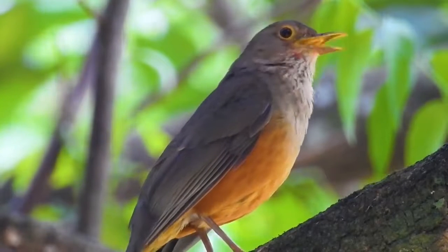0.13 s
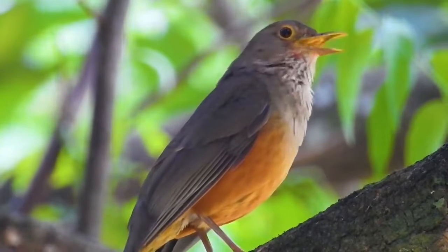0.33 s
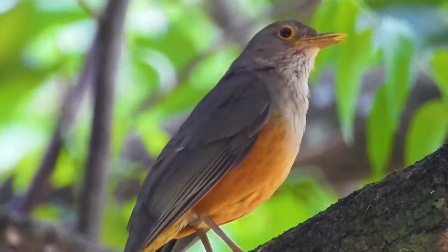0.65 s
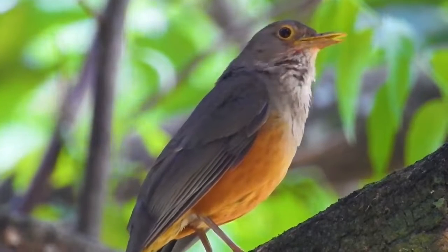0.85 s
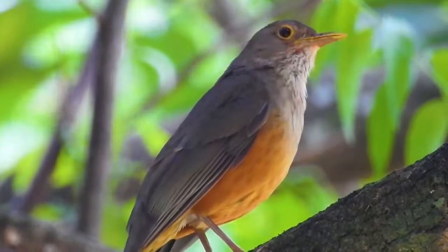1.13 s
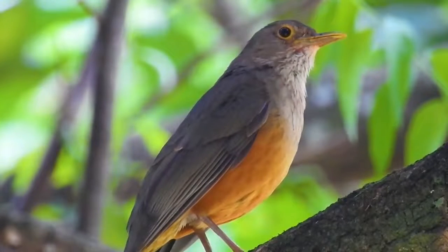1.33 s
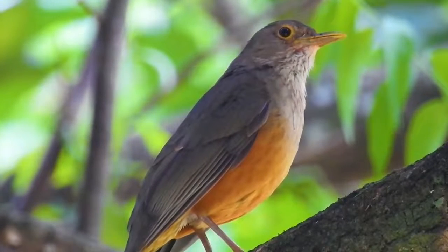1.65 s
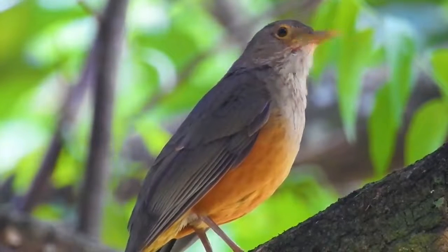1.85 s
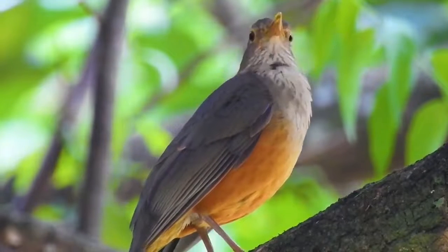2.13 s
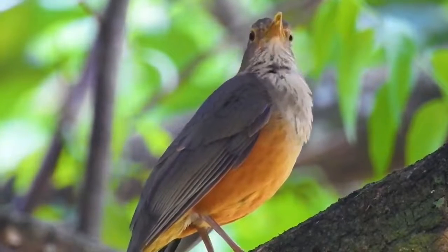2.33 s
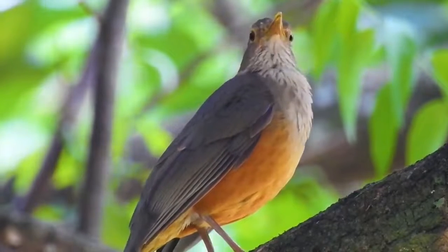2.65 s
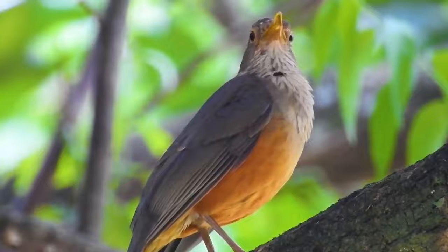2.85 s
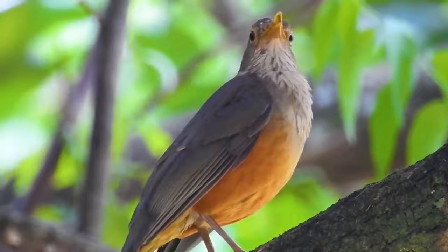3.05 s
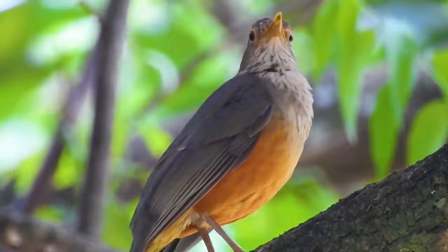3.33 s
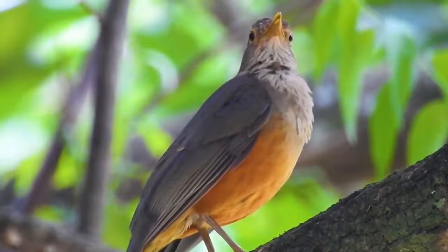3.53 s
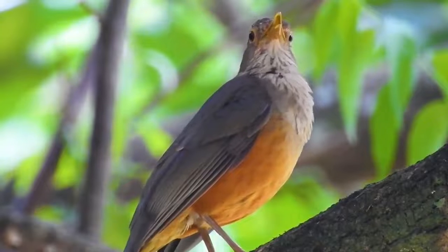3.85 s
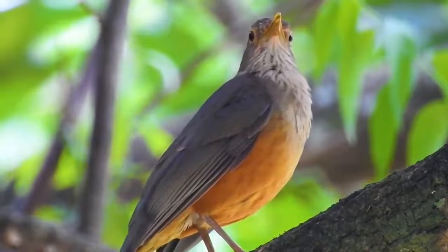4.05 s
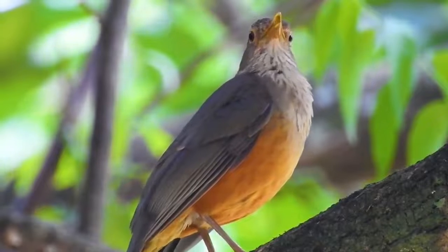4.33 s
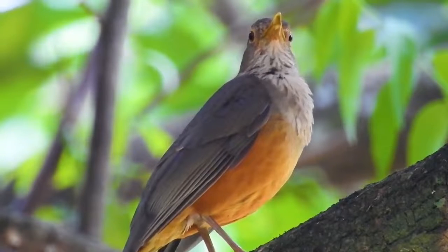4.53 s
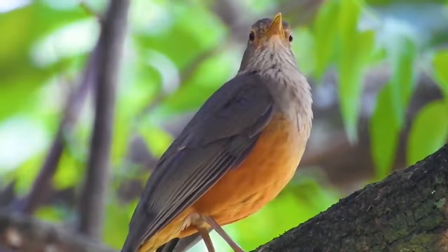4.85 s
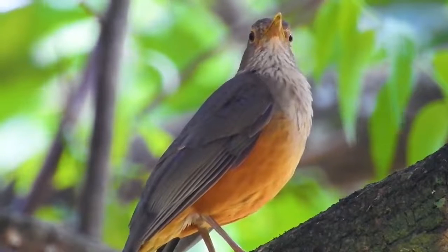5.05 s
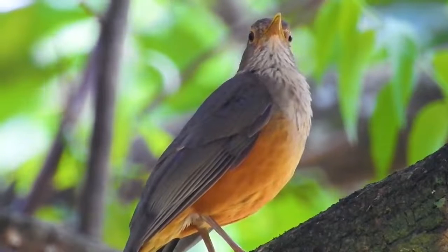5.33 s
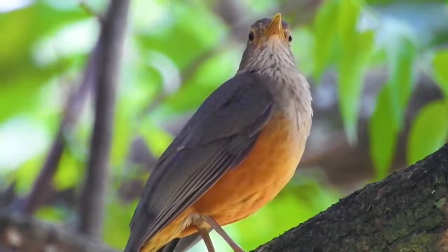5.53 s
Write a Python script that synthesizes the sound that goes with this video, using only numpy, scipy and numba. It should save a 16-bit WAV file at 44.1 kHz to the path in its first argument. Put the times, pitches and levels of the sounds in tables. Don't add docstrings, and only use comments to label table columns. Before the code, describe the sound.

Close, near-pure thrush whistles, mostly around 1.6 to 3.2 kHz, with soft scattered echo from leaves and trunks. A short wobbling note opens at 0 s; at 0.35 s a fast high swoop leads into a rising, held note until about 0.76 s. At 0.95 s a steady note breaks into a very brief rough trill, then drops, ending near 1.2 s. A small sharp click falls around 1.06 s. The bird rests until 2.4 s while a nearer cicada buzzes dryly; another bursts near 2.35 s and winds down in pitch after 2.7 s. Stepped whistles resume at 2.43 s, a swoop and rise at 3 s, a dipping note at 3.6 s, a settling note with pulsing trill at 4.0-4.3 s, and a falling flick into a strong rising note at 4.6-4.95 s. A quick high flourish closes at 5.15-5.5 s. Faint distant whistles, a twitter near 3.85 s and light hiss continue throughout.

```python
import sys
import numpy as np
from scipy import signal
from scipy.fft import rfft, irfft
from scipy.io import wavfile
from scipy.ndimage import uniform_filter1d
from numba import njit

SR = 44100
rng = np.random.default_rng(int(sys.argv[2]) if len(sys.argv) > 2 else 0)


def int16_out(signal):
    q = np.round(np.clip(np.atleast_2d(signal).T, -1, 1) * 32767)
    wavfile.write(sys.argv[1], SR, q.astype(np.int16))


def gain_from_decibels(decibels):
    exponent = np.asarray(decibels, float) / 20
    return 10 ** exponent


N = 251370
T = np.arange(N) / SR

# start_s, end_s, pulse_s (time of a pulse top),
# grow_s, above_hz (interval), second_db, band_db (sidebands), depth (0-1), slide_hz.
TRILLS = [
    dict(start_s=.966, end_s=1.088, pulse_s=.987, grow_s=.006, above_hz=405, second_db=-5.5, band_db=-16, depth=.45, slide_hz=85),
    dict(start_s=4.098, end_s=4.29, pulse_s=4.165, grow_s=.12, above_hz=280, second_db=4, band_db=-26, depth=1, slide_hz=150),
]


def set_rms(x, db):
    return x * gain_from_decibels(db) / np.sqrt(np.mean(x ** 2))


def curves(table):
    s, *columns = np.transpose(table)
    return [np.interp(T, s, c) for c in columns]


def colour(x, points):
    hz, db = np.transpose(points)
    f = np.maximum(np.arange(N // 2 + 1) * SR / N, 1)
    return irfft(rfft(x) * gain_from_decibels(np.interp(np.log(f), np.log(hz), db)), N)


def walk(rate_hz):
    k = int(SR / rate_hz)
    steps = np.repeat(rng.standard_normal(N // k + 1), k)
    return 1.32 * uniform_filter1d(uniform_filter1d(steps, k), k)[:N]


def fade(start_s, end_s, edge_s):
    return np.clip(np.minimum(T - start_s, end_s - T) / edge_s + 1, 0, 1) ** 2


def patches(shape, bins, frames):
    z = rng.standard_normal(shape)
    z = uniform_filter1d(uniform_filter1d(z, size=bins, axis=0), size=frames, axis=1)
    return z / z.std()


@njit
def svf(x, hz, width_hz):
    y, band, low = np.empty(len(x)), 0., 0.
    for i in range(len(x)):
        g, k = np.tan(np.pi * hz[i] / SR), width_hz / hz[i]
        v = (band + g * (x[i] - low)) / (1 + g * (g + k))
        band, low, y[i] = 2 * v - band, low + 2 * g * v, k * v
    return y


def pushes(rows):
    db, ms = np.full(N, -120.), 1000 * T
    for s, top_db, rise_ms, hold_ms, fall_ms in rows:
        before = (1000 * s - ms) / max(rise_ms, 5)
        after = (ms - 1000 * s - hold_ms) / max(fall_ms, 5)
        db = np.maximum(db, top_db - 20 * np.maximum(np.maximum(before, after), 0))
    return uniform_filter1d(db, size=130)


def glides(rows):
    ease, hook_hz, hook_late = 1.2, 120, 18
    share = np.linspace(0, 1, 40)
    out = []
    for s, span_s, hz, aim_hz, tau_s in rows:
        pitch_hz = aim_hz + (hz - aim_hz) * np.exp(-(share * span_s / tau_s) ** ease)
        out.append(np.c_[s + share * span_s, pitch_hz - hook_hz * share ** hook_late])
    return out


def trills():
    start_share, start_db = .36, -14
    out = np.zeros((6, N))
    for trill in TRILLS:
        grown = np.sqrt(np.clip((T - trill["start_s"]) / trill["grow_s"], 0, 1))
        share = start_share + (1 - start_share) * grown
        shy_db = start_db * (1 - grown)
        window = fade(trill["start_s"], trill["end_s"], .015)
        out += (window > 0) * np.array([
            window, share * trill["above_hz"], trill["second_db"] + shy_db, trill["band_db"] + shy_db,
            share * trill["depth"], share * trill["slide_hz"]])
    return out


def thrush():
    # time after the start in seconds, pitch in Hz.
    figures = dict( wobble=[(0, 2250), (.012, 1990), (.035, 1835), (.06, 1880), (.1, 2075), (.13, 2050)],
               swoop=[(.006, 2960), (.018, 3130), (.03, 3210), (.045, 3110), (.068, 2900), (.073, 2740),
               (.082, 2650), (.087, 2430), (.097, 2340), (.106, 2260)], drop=[(0, 2000), (.03, 2015),
               (.137, 2045), (.157, 2043), (.18, 1739), (.205, 1650), (.25, 1640)], step=[(0, 1690),
               (.012, 1730), (.017, 2150), (.03, 2040), (.115, 2046), (.155, 2086), (.197, 2172),
               (.202, 1950), (.212, 1810), (.24, 1800)], dip=[(.004, 2080), (.025, 2150), (.06, 1892),
               (.1, 1647), (.13, 1593), (.17, 1637), (.26, 1911), (.29, 1986), (.31, 2000)],
               settle=[(0, 2190), (.02, 2143), (.04, 2030), (.11, 2000), (.18, 2030), (.23, 2080),
               (.28, 2100)], flick=[(0, 2650), (.02, 2680), (.028, 2400), (.034, 2330), (.045, 1980)],
               stairs=[(0, 2560), (.013, 2620), (.016, 2400), (.02, 2380), (.024, 2000), (.034, 2000)],
               arch=[(0, 2950), (.06, 3200), (.11, 3300), (.13, 3200), (.155, 2950)])
    # start in seconds, figure, time stretch (ratio), transposition (ratio).
    sung = [
        (0, "wobble", 1, 1),
        (.355, "swoop", 1, 1),
        (.943, "drop", 1, 1),
        (2.425, "step", 1, 1),
        (2.985, "swoop", .98, .98),
        (3.6, "dip", 1, 1),
        (4.018, "settle", 1, 1),
        (4.615, "flick", 1, 1),
        (5.18, "arch", 1, 1),
        (5.345, "stairs", 1, 1),
    ]
    # start in seconds, length in seconds, first Hz, aim in Hz,
    # time constant in seconds.
    glide_rows = [
        (.497, .263, 2130, 2603, .026),
        (2.672, .19, 1800, 1835, .05),
        (3.128, .18, 2318, 2608, .036),
        (4.67, .28, 1720, 2157, .057),
        (5.13, .035, 2880, 2905, .02),
        (5.385, .09, 3020, 2560, .07),
    ]
    # top in seconds, level in dB, rise in ms per 20 dB, hold
    # in ms, fall in ms per 20 dB.
    breath_rows = [(.008, -30, 9.5, 1, 23), (.084, -27.5, 60.5, 1.1, 62), (.385, -38, 29, 5, 59),
                   (.415, -25, 47, 1, 89), (.433, -24.5, 14, 3.6, 13), (.446, -30, 10, 7, 30),
                   (.505, -31, 6, 26, 33), (.547, -34.5, 19, 6.2, 32), (.585, -27, 70, 4.9, 60),
                   (.612, -26, 121, 2.9, 47), (.668, -37, 8, 4, 10), (.705, -34.5, 57, 17, 56),
                   (.975, -33.5, 42, 118, 97), (1.097, -23.5, 30, 4, 5), (1.116, -39.5, 18, 44, 50),
                   (2.452, -31, 11, 26, 100), (2.477, -26, 47, 69, 125), (2.555, -25.5, 86, 22, 25),
              (2.605, -25, 45, 12, 20), (2.629, -30, 10, 2.6, 20), (2.766, -43, 100, 1, 34),
              (2.79, -49, 20, 3.6, 27), (2.845, -49, 30, 4, 30), (2.994, -33, 5, 13, 56),
              (3.035, -23, 57, 6, 17), (3.06, -25, 20, 4.2, 20), (3.072, -26.5, 10, 5.2, 14),
              (3.14, -25.5, 24, 8.5, 91), (3.212, -23, 75, 22, 100), (3.266, -23, 110, 12, 30),
              (3.647, -28, 56, 0.9, 34), (3.679, -38, 41, 137, 50), (3.854, -26.5, 33, 10, 50),
              (3.882, -26.5, 20, 5.3, 23),
                   (4.024, -31.5, 6.3, 20, 78), (4.062, -22, 75, 29, 110), (4.142, -24.5, 61, 13, 27),
               (4.172, -28, 49, 67, 74), (4.631, -29, 19, 2.6, 27), (4.722, -26, 32, 24, 150),
               (4.84, -20.5, 170, 18, 70), (4.9, -26.5, 77, 17, 32), (5.15, -46.5, 70, 6.2, 12),
               (5.228, -46.5, 270, 0.97, 70), (5.305, -50, 38, 18, 28), (5.352, -37, 14, 6, 10),
               (5.363, -36, 6, 1, 8), (5.371, -38, 5.4, 5.3, 20), (5.39, -24.5, 5.9, 7.1, 40),
               (5.441, -27.5, 15, 18.5, 8), (5.477, -35, 12, 2, 10)]
    trill_hz = 44.8
    second_rest = .2
    steep_hz_per_s, grain_db, grain_hz = 15000, 4, 40

    trilling, above_hz, second_db, band_db, depth, swing_hz = trills()
    notes = glides(glide_rows)
    for s, name, stretch, shift in sung:
        notes.append(np.array(figures[name]) * [stretch, shift] + [s, 0])
    notes.sort(key=lambda note: note[0, 0])

    turn = 2 * np.pi * np.cumsum(trill_hz * (1 + 0.02 * walk(26))) / SR
    pulse_s = [trill["pulse_s"] for trill in TRILLS]
    nearest = np.abs(T[:, None] - pulse_s).argmin(axis=1)
    turn = turn - np.interp(pulse_s, T, turn)[nearest]
    pulses = trilling * (1 + np.cos(turn)) / 2
    slide_hz = trilling * swing_hz * (1 + np.sin(turn)) / 2

    hz = uniform_filter1d(curves(np.vstack(notes))[0], size=130) * (1 + 0.0013 * walk(60)) + slide_hz
    fall_hz_per_s = -uniform_filter1d(np.gradient(hz), size=400) * SR
    falling = np.clip(fall_hz_per_s / steep_hz_per_s, 0, 1) * (trilling == 0)
    hz = hz + grain_hz * falling * walk(170)
    db = pushes(breath_rows) + grain_db * falling * walk(140)
    phase = 2 * np.pi * np.cumsum(hz) / SR
    beat = 2 * np.pi * np.cumsum(above_hz * (1 + 0.071 * walk(200)) - 0.8 * slide_hz) / SR
    gate = np.minimum(sum(fade(note[0][0], note[-1][0], .005) for note in notes), 1)

    buzz = np.sin(phase + 2.3 * beat + walk(200))
    buzz = buzz + np.sin(phase + 1.6 * beat + 2.1 * walk(150))
    buzz = buzz + 0.3 * np.sin(phase + 2.9 * beat + walk(200))
    first = (1 - np.clip(depth, 0, 1) * pulses) * np.sin(phase) + gain_from_decibels(-37.0) * np.sin(2 * phase)
    second = gain_from_decibels(second_db) * np.sin(phase + beat) + gain_from_decibels(band_db) * buzz
    second_gate = second_rest * trilling + (1 - second_rest) * pulses
    return np.sqrt(2) * gate * gain_from_decibels(db + 1.0 * walk(40)) * (first + second_gate * second)


def slaps(bird):
    # delay in seconds, level in dB.
    slap_rows = [
        (.0115, -12),
        (.027, -16),
    ]
    return sum(gain_from_decibels(db) * np.interp(T - late_s, T, bird, left=0) for late_s, db in slap_rows)


def far_birds():
    # start in seconds,
    # length in seconds, first Hz, last Hz, level in dB.
    whistles = [(.015, 0.1, 3520, 3450, -55.5), (.14, .1, 3240, 3260, -54), (.886, 0.69, 2528, 2534, -59.5),
                (1.504, 0.37, 1932, 1850, -61.5), (2.1, 0.3, 2444, 2456, -56.5),
                (2.545, 0.11, 3060, 3150, -53.5), (2.818, 0.059, 3244, 3230, -47),
                (3.414, 0.13, 2577, 2550, -51), (3.379, 0.24, 2370, 2200, -52),
                (4.113, 0.065, 3104, 3030, -48), (4.38, 0.19, 3230, 3128, -52), (2.0, .07, 2750, 2704, -57),
                (2.15, 0.22, 2790, 2790, -57.5), (2.17, 0.057, 3080, 3130, -57),
                (5.0, 0.094, 2146, 2162, -52), (2.755, .07, 2160, 2170, -50)]
    peeps = [(0, .012, 2400, 2350, -52), (.06, 0.032, 2880, 2960, -56), (.225, 0.014, 3730, 3550, -56),
             (.702, 0.011, 3820, 3760, -48), (1.87, 0.037, 3834, 3743, -49.5),
             (2.08, 0.088, 3600, 3540, -56), (2.665, 0.022, 3180, 3097, -41.5),
             (2.688, .022, 3100, 3147, -40.5), (2.832, 0.063, 4830, 4810, -45.5),
             (3.622, 0.076, 3250, 3247, -50), (4.642, 0.019, 2050, 1990, -47.5),
             (5.28, 0.038, 5930, 5500, -46), (5.293, 0.016, 4500, 4440, -49), (5.349, .02, 3200, 3300, -55),
             (5.372, 0.012, 3680, 3640, -49.5), (5.378, 0.012, 1900, 2300, -42),
             (5.379, 0.011, 2340, 2890, -35.5), (5.6, 0.086, 1973, 1990, -54),
             (5.05, .035, 5600, 5360, -50.5), (5.436, .026, 2900, 2840, -31), (2.7, .025, 2070, 2040, -42),
             (5.512, 0.015, 2730, 2820, -44), (5.531, 0.014, 2770, 2760, -44),
             (5.549, 0.013, 2734, 2810, -43.5)]
    twitter = [(3.811, 0.014, 4520, 4450, -39), (3.829, 0.0083, 4430, 4450, -39),
               (3.836, 0.021, 5740, 5720, -37), (3.85, 0.017, 4490, 4380, -36.5),
               (3.866, 0.011, 4430, 4100, -37), (3.887, 0.028, 5630, 5820, -35),
               (3.898, 0.019, 4230, 3950, -39.5), (3.918, .014, 4070, 3840, -31.5),
               (3.921, 0.012, 4340, 4200, -35.5), (3.932, 0.0071, 3570, 3400, -38),
               (3.933, 0.0096, 4350, 4300, -42)]
    warble_rate_hz, least_warbles = 17, 4.2
    out = np.zeros(N)
    for table, rate_hz in ((whistles, warble_rate_hz), (peeps, 0), (twitter, 89)):
        for s, length_s, hz0, hz1, db in table:
            t = np.arange(int(length_s * SR)) / SR
            warble_hz = 0
            if rate_hz:
                warble_hz = max(rate_hz, min(least_warbles / length_s, 2 * warble_rate_hz))
            shape = np.sin(np.pi * t / length_s) ** .8
            shape = shape * (1 - 0.16 * (1 - np.cos(2 * np.pi * warble_hz * t)))
            tone = np.sin(2 * np.pi * (hz0 + (hz1 - hz0) * t / length_s / 2) * t)
            i = int(s * SR)
            out[i:i + len(t)] += np.sqrt(2) * gain_from_decibels(db) * shape * tone
    return np.interp(T + 3e-5 * walk(120), T, out) * gain_from_decibels(3 * walk(110))


def ticks():
    # start in seconds, peak in dB, centre in Hz, width in Hz, t60 in seconds.
    tick_rows = [(0, -46, 3400, 1200, .9), (.061, -36, 6960, 5000, .02), (.76, -44, 4970, 3000, .03),
                 (.98, -38, 9400, 12000, .054), (.978, -38, 6200, 3000, .025),
                 (1.059, -31.5, 5300, 906, .024), (3.58, -51, 4600, 1500, .03), (3.84, -41, 3000, 1600, .7),
                 (3.88, -39, 4200, 2200, .5), (4.13, -46, 10800, 3000, .58), (4.7, -50, 5000, 2500, .5),
                 (5.362, -35, 2500, 1800, .07), (5.6, -47, 9000, 9140, .08)]
    out = 0
    for s, db, hz, width_hz, t60_s in tick_rows:
        decay = (T >= s) * np.exp(-np.log(1000) * np.maximum(T - s, 0) / t60_s)
        mid, side = decay * rng.standard_normal((2, N))
        burst = mid + 0.23 * side * np.array([[1], [-1]])
        centre, width = np.full(N, 1. * hz), 1. * width_hz
        ring = np.array([svf(svf(c, centre, width), centre, width) for c in burst])
        out = out + gain_from_decibels(db) * ring / np.abs(ring).max()
    return out


def foliage(x):
    near_t60_s, far_t60_s, far_db = .27, .59, -14.5
    wall_s, wall_spread_s, wall_db = .19, .039, -24
    rise_s, echo_db, side_db = .015, -7.5, -10
    sway_s = 8e-5
    t = T[:SR]
    decay = np.exp(-np.log(1000) * t / near_t60_s) + gain_from_decibels(far_db) * np.exp(-np.log(1000) * t / far_t60_s)
    decay = decay + gain_from_decibels(wall_db) * np.exp(-((t - wall_s) / wall_spread_s) ** 2)
    mid, side = rng.standard_normal((2, SR)) * decay * np.clip(t / rise_s, 0, 1)
    both = mid + gain_from_decibels(side_db) * side * np.array([[1], [-1]])
    out = np.interp(T + sway_s * walk(40), T, x)
    response = gain_from_decibels(echo_db) * both / np.sqrt(np.sum(mid ** 2))
    back = signal.fftconvolve(out[None], response, axes=1)[:, :N]
    sway = T + sway_s * walk(90) * .7
    return np.array([np.interp(sway, T, c) for c in back])


def hiss(points, top_hz, flicker_db):
    # frequency in Hz, side minus mid in dB.
    side_width = [(300, -30), (1000, -22), (2500, -12.5), (3800, -11.5), (4300, -6.5), (7800, -2.5),
                  (8300, -11), (9300, -12), (11300, -17), (12300, -3)]
    hz, db = np.transpose(points)
    top = [(top_hz, points[-2][1]), (top_hz * 1.0035, -70)]
    shape = [(hz[0] / 8, db[0] - 4.0)] + points[1:-1] + top
    mid, side = (colour(rng.standard_normal(N), shape) for _ in range(2))
    side = colour(side, side_width)
    _, _, z = signal.stft(np.array([mid + side, mid - side]), SR, nperseg=2048, noverlap=1536)
    streaks = patches(z.shape[1:], bins=2, frames=10) + 0.37 * patches(z.shape[1:], bins=14, frames=20)
    x = signal.istft(z * gain_from_decibels(flicker_db * streaks), SR, nperseg=2048, noverlap=1536)[1]
    return set_rms(x[:, :N], 0)


def garden():
    # frequency in Hz, density in dB per Hz.
    spectrum = [(120, -99), (200, -66), (587, -33), (739, -31.5), (1190, -19.5), (1750, -17.5), (1920, -13),
                (2610, -14.5), (2780, -13.5), (3390, -13.5), (3950, -16.5), (4340, -14), (5900, -12),
                (6470, -4), (7900, -11.5), (10300, -48), (17400, -120)]
    # time in seconds, level in dB.
    swell = [(0., -47), (.6, -47.5), (.85, -50), (1.03, -48), (2.24, -45.5), (2.4, -48), (2.75, -45),
             (3.4, -47.5), (3.83, -43), (5., -46), (5.7, -45)]
    return gain_from_decibels(curves(swell)[0] + 2.0) * hiss(spectrum, 7872, 3.84)


def air():
    # frequency in Hz, density in dB per Hz.
    spectrum = [(4760, -51), (8100, -7), (8240, -10.5), (8560, 3), (8950, -1), (10500, -13), (13600, -17),
                (14300, -26)]
    return gain_from_decibels(-61.5) * colour(hiss(spectrum, 15400, 2.2), [(7900, -39.5), (8150, 1.5)])


def cicada(hz, db, width_hz, buzz_hz, depth):
    buzz = 1 + depth * np.cos(2 * np.pi * np.cumsum(buzz_hz * (1 + 0.14 * walk(8.6))) / SR)
    mid, side = (svf(svf(buzz * rng.standard_normal(N), hz, width_hz), hz, width_hz) for _ in range(2))
    both = mid + 0.87 * side * np.array([[1], [-1]])
    return set_rms(both, 0) * gain_from_decibels(db + 0.3 * walk(15))


def near_cicada():
    # top in seconds, level in dB, rise in ms per 20 dB, hold in ms, fall in ms per 20 dB.
    bouts = [
        (.6, -55, 201, 1, 542),
        (1.12, -39, 170, 1180, 358),
        (1.5, -35, 1502, 1, 1499),
        (3.2, -47, 2001, 1, 894),
        (5., -46, 997, 1, 902),
    ]
    # time in seconds, body resonance in Hz.
    resonance = [(.6, 7170), (1.12, 6690), (1.5, 6566), (2.15, 6470), (2.3, 5980), (3.2, 6970), (5., 6220)]
    return cicada(curves(resonance)[0], pushes(bouts), 260., 68, .5)


def winding_cicada():
    # top in seconds, level in dB, rise in ms per 20 dB, hold in ms, fall in ms per 20 dB.
    bouts = [
        (2.35, -34.5, 110, 1, 100),
        (2.74, -38.5, 101, 60, 200),
        (3.62, -42, 44, 1, 454),
    ]
    # start in seconds, length in seconds, first Hz, aim in Hz, time constant in seconds.
    glide_rows = [
        (2.15, .5, 6800, 6950, 0.2),
        (2.68, 0.54, 7060, 4500, 0.12),
        (3.55, 0.85, 5240, 4460, 0.22),
    ]
    return cicada(curves(np.vstack(glides(glide_rows)))[0], pushes(bouts), 750.0, 150, 0.14)


def scene():
    bird, far = thrush(), far_birds()
    direct = gain_from_decibels(-0.2) * (bird + slaps(bird))
    far_wide = far * gain_from_decibels(np.array([[1.5], [-1.5]]))
    echo = foliage(bird + gain_from_decibels(6) * far)
    insects = colour(near_cicada() + winding_cicada(), [(7800, -7.0), (8000, -17.0)])
    return direct + far_wide + echo + garden() + air() + insects + ticks()


def roll_off(x):
    return signal.sosfilt(signal.butter(12, 15710, fs=SR, output="sos"), x)


def record(dry):
    cut = signal.sosfilt(signal.butter(2, 250, "high", fs=SR, output="sos"), dry)
    return roll_off(cut)


dry = scene()
out = record(dry)
int16_out(out)
```